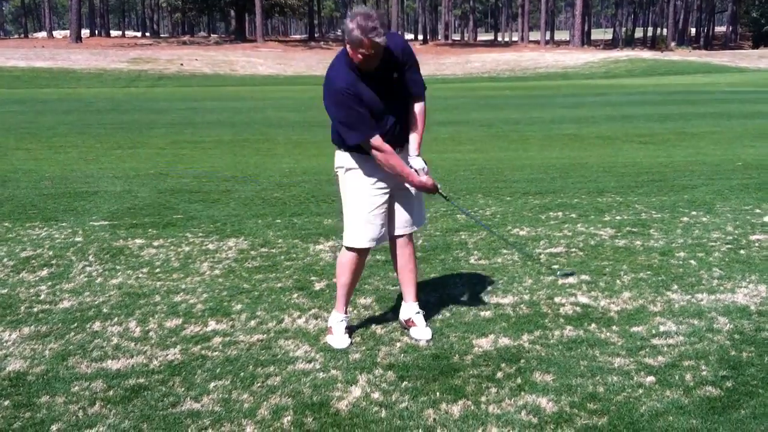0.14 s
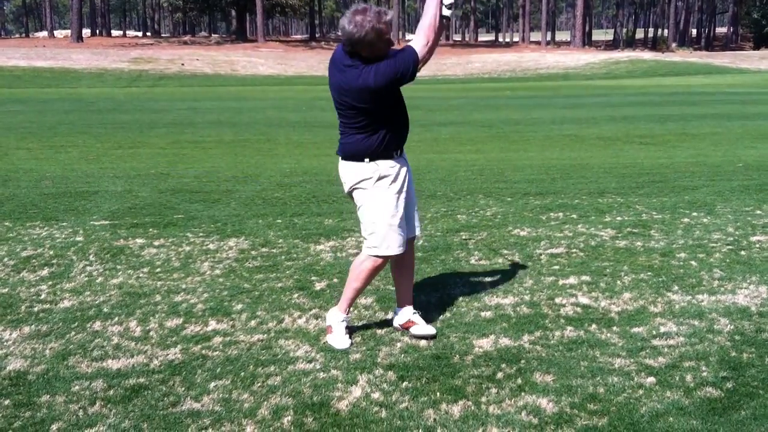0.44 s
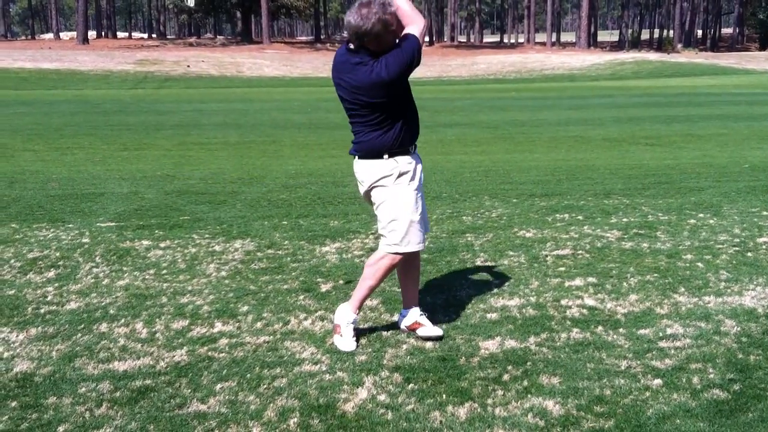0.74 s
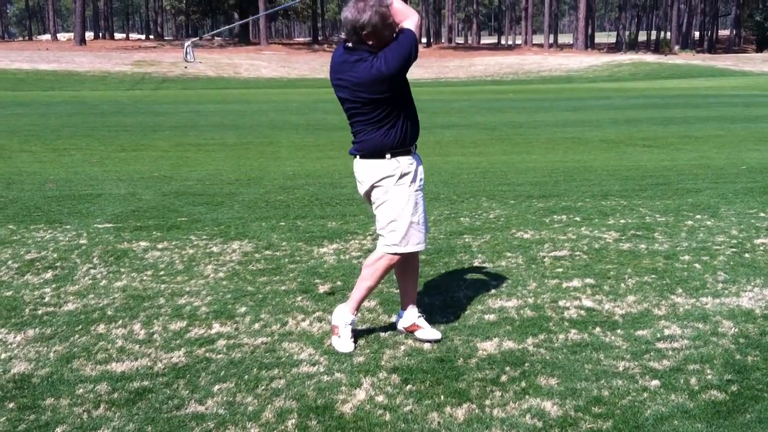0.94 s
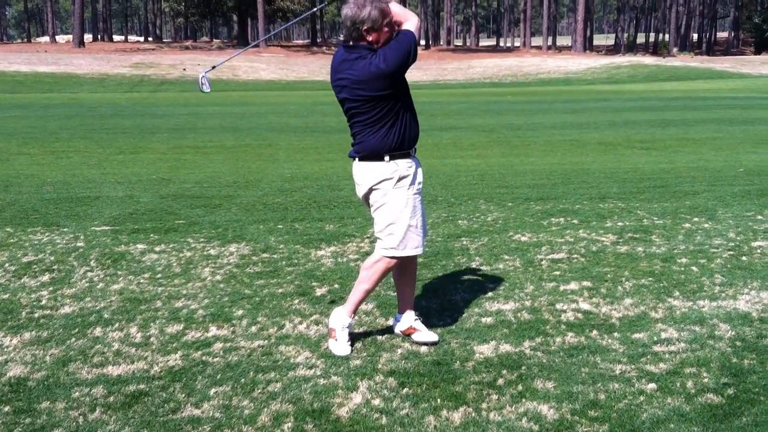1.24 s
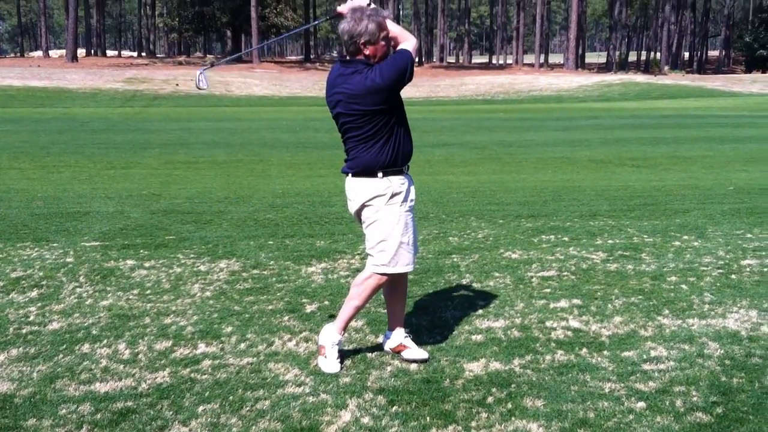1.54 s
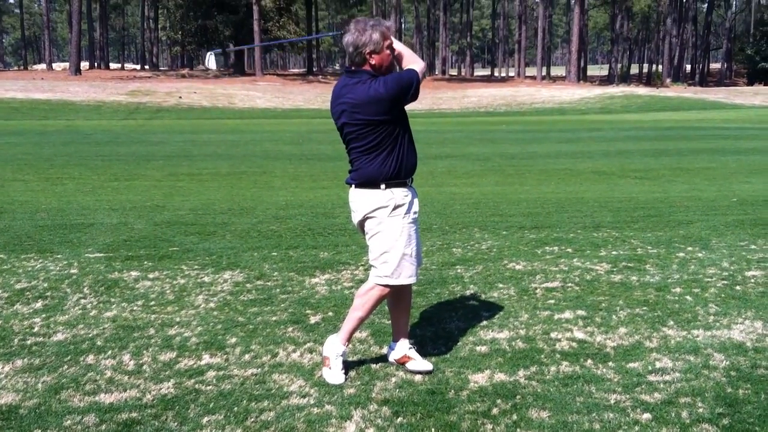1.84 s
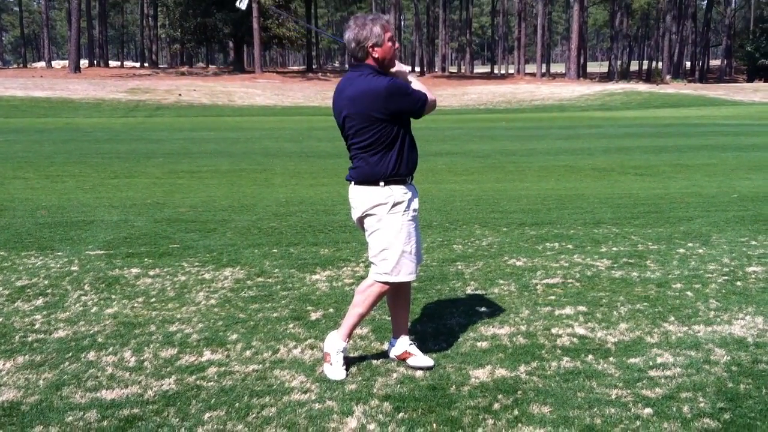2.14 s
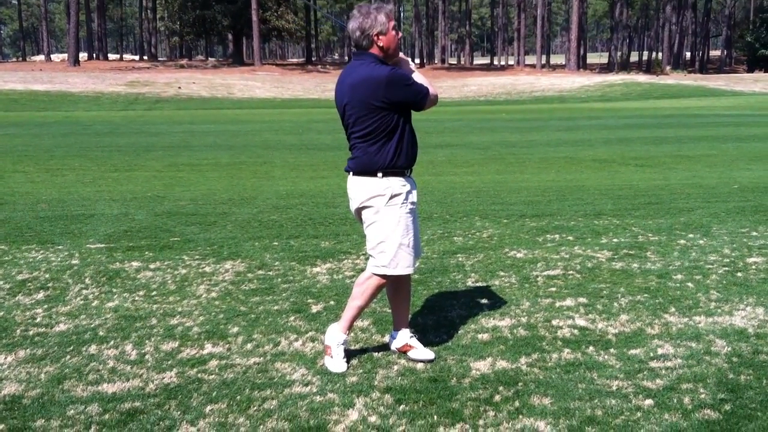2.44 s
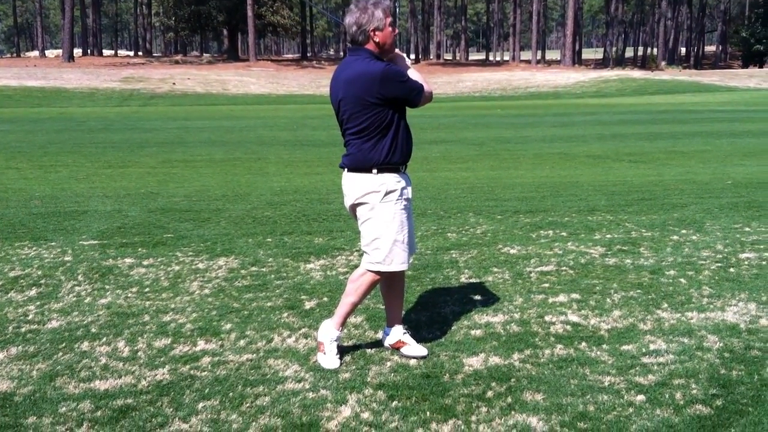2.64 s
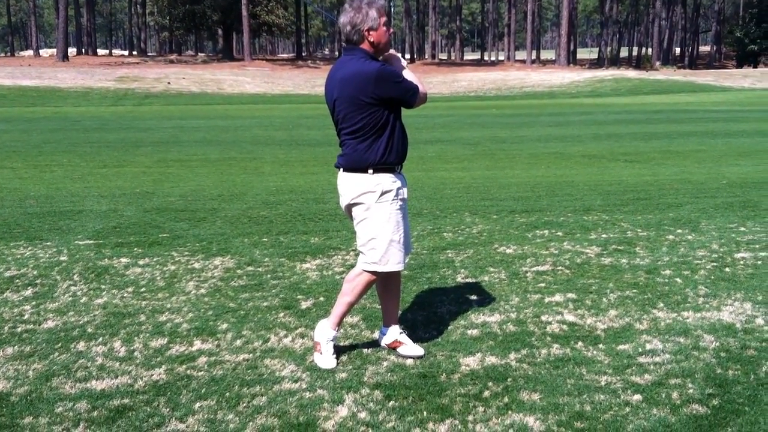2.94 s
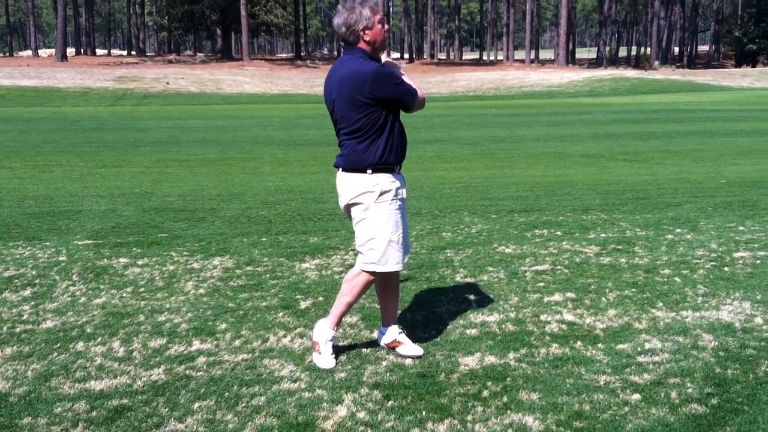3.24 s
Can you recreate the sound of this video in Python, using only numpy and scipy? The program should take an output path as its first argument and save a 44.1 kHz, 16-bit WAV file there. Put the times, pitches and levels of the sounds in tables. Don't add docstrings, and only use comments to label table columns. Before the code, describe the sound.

A golf club cracks sharply against a ball, then wind buffets the microphone in thumps.

```python
import sys
import numpy as np
from scipy import signal
from scipy.io import wavfile
from scipy.ndimage import uniform_filter1d

SR = 44100
rng = np.random.default_rng(int(sys.argv[2]) if len(sys.argv) > 2 else 0)


def ratio_of_db(decibels):
    return 10 ** (np.asarray(decibels, float) / 20)


def bounce(signal):
    frames = np.transpose(np.atleast_2d(signal))
    limited = np.clip(frames, -1, 1)
    pcm = np.round(limited * 32767).astype(np.int16)
    wavfile.write(sys.argv[1], SR, pcm)


N = 149940
T = np.arange(N) / SR

# (frequency [Hz], level [dB], t60 [s])
HEAD_MODES = [(2190, -11, 0.0061), (6460, -9, 0.0039), (1352, -24, 0.0141), (2450, -18, 0.016),
              (3210, -27, 0.025), (462, -38, 0.011), (5110, -22, 0.026), (10570, -9, .008),
              (7410, -23.5, 0.0111), (9500, -10, 0.014), (12100, -23.5, 0.0089)]
# (frequency [Hz], density [dB per Hz])
TURF_COLOUR = [(300, -12), (800, -17), (2300, -1.5), (4000, -13.5), (6500, -4), (8300, -11.5),
               (10600, -5.5), (15000, -37.5)]
# (start [s], attack [s], level [dB], t60 [s])
TURF_BURSTS = [
    (0.176, 0.0017, -33.5, 0.022),
    (0.1822, 0.0011, -20.5, 0.038),
    (0.2, 0.0023, -49, 0.059),
]
# (start [s], attack [s], level [dB], t60 [s])
SPRAY_BURSTS = [
    (.215, 0.02, -60.5, 0.34),
    (.322, 0.0074, -60, 0.082),
    (.456, 0.0076, -64, 0.12),
    (.478, 0.0053, -66.5, 0.19),
    (2.525, .006, -71.5, 0.074),
]
# (frequency [Hz], density [dB per Hz])
SPRAY_COLOUR = [(2000, -61.5), (4000, -6), (5500, 1.5), (9000, -7), (12000, -15.5), (14000, -26.5),
                (15400, -17)]
# (time [s], vortex tone [Hz], tone level [dB], hiss level [dB])
SWISH_PATH = [
    (.04, 290, -72, -80),
    (.086, 350, -54, -67),
    (.128, 440, -49, -53),
    (.17, 490, -46, -55),
    (.183, 470, -47, -58),
    (.197, 420, -64, -61),
    (.255, 330, -72, -63),
    (.29, 300, -85, -80),
]
# (frequency [Hz], density [dB per Hz])
SWISH_COLOUR = [(600, -9.5), (1800, 0.5), (3500, -6.5), (6000, -15.5), (14000, -36.5)]
# (time [s], level [dB], shedding pitch [Hz])
EARLY_EDDIES = [(0.298, -33.5, 257), (0.331, -35, 213), (0.462, -31, 210), (0.579, -25, 237),
                (0.649, -38, 258), (0.673, -33.5, 154), (0.81, -36.5, 236), (0.869, -28, 180),
                (0.883, -27, 235), (0.903, -55, 190), (0.945, -26.5, 203), (1.0, -31.5, 217),
                (1.042, -24, 202), (1.096, -26, 188), (1.161, -26.5, 260), (1.197, -30.5, 166),
                (1.219, -34.5, 187), (1.27, -35, 257), (1.287, -35, 223), (1.353, -20, 159.5),
                (1.377, -28, 275), (1.415, -28, 268), (1.432, -36.5, 197), (1.475, -30, 213),
                (1.552, -32, 203), (1.703, -25.5, 230), (1.73, -47, 266), (1.75, -28, 171),
                (1.837, -34, 188), (1.932, -28.5, 267)]
# (time [s], level [dB], shedding pitch [Hz])
LATE_EDDIES = [(1.945, -26.5, 220), (2.097, -37, 176), (2.12, -34, 188), (2.209, -33.5, 195),
               (2.243, -22.5, 216), (2.276, -37.5, 176), (2.29, -38, 200), (2.31, -29.5, 286),
               (2.358, -23.5, 178), (2.401, -48, 180), (2.42, -34, 172), (2.461, -31.5, 187),
               (2.515, -23.5, 241), (2.585, -28, 231), (2.613, -29, 200), (2.638, -35.5, 180),
               (2.689, -33.5, 244), (2.742, -26.5, 245), (2.841, -31, 278), (2.859, -32, 190),
               (2.883, -21, 262), (2.911, -38, 272), (2.932, -26, 216), (2.959, -33.5, 266),
               (2.982, -39, 200), (2.997, -30.5, 236), (3.01, -35, 202), (3.082, -33, 225),
               (3.116, -26.5, 213), (3.128, -28, 230)]
# (time [s], level [dB], shedding pitch [Hz])
WEAK_EDDIES = [(0.214, -48, 184), (0.404, -46, 187), (0.439, -38.5, 344), (0.451, -37, 214),
               (0.52, -39, 172), (0.591, -33, 224), (0.608, -43.5, 140), (0.661, -41, 218),
               (0.689, -43, 175), (0.711, -38.5, 188), (0.752, -43, 174), (0.77, -43.5, 188),
               (0.794, -42.5, 189), (0.821, -43.7, 174), (0.849, -42, 154), (0.902, -39.5, 211),
               (0.964, -35.5, 215), (1.012, -45.7, 162), (1.077, -28.5, 273), (1.122, -40.5, 188),
               (1.231, -41, 240), (1.248, -46, 160), (1.262, -40, 237), (1.325, -34, 163),
               (1.338, -29.5, 231), (1.398, -34.5, 215), (1.453, -42, 181), (1.501, -46, 200),
               (1.617, -40.5, 214), (1.731, -35, 258), (1.76, -37.5, 176), (1.785, -46, 206),
               (1.795, -41, 178), (1.825, -39.5, 240), (1.912, -40.5, 260), (1.97, -45, 194),
               (2.01, -41.5, 200), (2.028, -46, 162), (2.039, -48.5, 205), (2.144, -45, 164),
               (2.171, -44, 187), (2.227, -37, 218), (2.262, -42, 210), (2.324, -35.5, 171),
               (2.342, -26.5, 178), (2.402, -37, 202), (2.442, -39.5, 222), (2.479, -45.9, 160),
               (2.555, -43, 143), (2.71, -37, 171), (2.804, -45, 170), (2.896, -34, 154), (3.065, -44, 195),
               (3.104, -39, 207), (3.163, -41.5, 200), (3.229, -45.5, 172), (3.336, -44, 196),
               (3.349, -44.5, 184)]
# (time [s], level [dB], width [ms])
EDDY_POPS = [(.294, -31, 0.39), (.44, -41, 0.44), (.571, -37, 0.35), (.581, -42, .4), (.59, -36, 0.67),
             (0.645, -47, 0.42), (.806, -42.5, 0.43), (.94, -41.5, 0.44), (1.029, -45, 0.42),
             (1.042, -42.5, .45), (1.079, -46.5, 0.3), (1.087, -39.5, 0.36), (1.159, -44, 0.49),
             (1.322, -45, .4), (1.335, -38, 0.36), (1.349, -45.5, 0.21), (1.374, -38.5, 0.42),
             (1.406, -38, 0.42), (1.4684, -38, 0.3), (1.4703, -39, .33), (1.7, -37.5, 0.32),
             (1.746, -47.5, 0.22), (1.911, -46, 0.41), (1.93, -38.5, 0.41), (1.938, -36, 0.36),
             (1.95, -38.5, 0.43), (2.233, -40.5, 0.28), (2.349, -43.5, 0.36), (2.36, -38, 0.44),
             (2.517, -40.5, 0.55), (2.58, -34.5, 0.42), (2.88, -46, 0.5), (3.082, -47, 0.48),
             (3.116, -39.5, 0.33)]
# (time [s], pitch [Hz], level [dB])
WHISTLE_GLIDE = [
    (.59, 6830, -92),
    (.63, 6700, -81),
    (.712, 6560, -79),
    (.733, 5700, -78),
    (.762, 5020, -79),
    (.82, 4700, -82),
    (.86, 4620, -76),
    (.875, 4620, -92),
]
# (start [s], length [s], pitch [Hz], level [dB])
BIRD_NOTES = [(.375, .08, 9040, -75), (.445, .04, 9040, -71), (.48, .08, 9040, -77), (.24, .035, 5440, -63),
              (.3, .05, 5440, -73), (.46, .045, 5440, -71), (.5, .045, 5440, -78), (.34, .12, 12700, -90),
              (.31, .24, 15350, -85), (.94, .12, 3490, -77), (1.48, .17, 3490, -76), (.96, .14, 4250, -78)]
# (centre [Hz], bandwidth [Hz], level [dB], loudest at [s], swell
# span [s])
FAR_SINGERS = [
    (1533, 84, -66.5, 2.22, 0.86),
    (2865, 230, -73.5, 2.28, 0.96),
    (2420, 900, -71, 2.14, 0.43),
]
# (frequency [Hz], density [dB per Hz])
AIR_COLOUR = [(60, -33), (150, -9), (300, -25.5), (600, -24), (1500, -27.5), (2800, -38.5), (4000, -43.5),
              (9700, -57), (15500, -66)]


def at_hz(points, hz):
    table = np.array(points)
    return np.interp(np.log(hz), np.log(table[:, 0]), table[:, 1])


def rms_one(x):
    return x / np.sqrt(np.mean(x ** 2) + 1e-20)


def drift(rate_hz):
    r = np.exp(-80 * np.pi * rate_hz / SR)
    slow = signal.lfilter([1], [1, -2 * r, r * r], rng.standard_normal(N // 40 + 2002))[2000:]
    return np.interp(np.arange(N) / 40, np.arange(len(slow)), rms_one(slow))


def coloured(spectrum, patchy_db, shape=lambda hz: 1):
    out, power = 0, 0
    edges = 40 * 2 ** np.arange(0, 9, .5)
    white = rng.standard_normal((2, N))
    for k, (low, high) in enumerate(zip(edges, edges[1:])):
        centre = np.sqrt(low * high)
        sos = signal.butter(2, [low, high], "band", fs=SR, output="sos")
        band = signal.sosfilt(sos, white[k % 2])
        band = band * ratio_of_db(at_hz(spectrum, centre) + patchy_db * drift(9))
        out = out + band * shape(centre)
        power = power + np.mean(band ** 2)
    return out / np.sqrt(power)


def burst(rows):
    out = np.zeros(N)
    for start, attack, db, t60 in rows:
        rise = np.clip((T - start) / attack, 0, 1)
        fall = ratio_of_db(-60 * np.maximum(T - start - attack, 0) / t60)
        out += ratio_of_db(db) * rise * fall
    return out


def bumps(seconds, heights, widths, pitches_hz=None):
    sag = 0.34
    out, k = np.zeros(N + 2000), np.arange(-1000, 1000)
    for j, (s, height, width) in enumerate(zip(seconds, heights, widths)):
        i = int(np.clip(s * SR, 0, N - 1))
        t = (k - (s * SR - i)) / SR
        turns = 0
        if pitches_hz is not None:
            turns = pitches_hz[j] * t * (1 - sag * np.tanh(t / width) / 2)
        bell = np.exp(-.5 * (t / (abs(width) + 1 / SR)) ** 2)
        out[i:i + 2000] += height * bell * np.cos(2 * np.pi * turns)
    return out[1000:N + 1000]


def crack():
    hit_s, contact_s = .18125, 0.00004
    ground_lag_s, ground_db = 0.00022, 4.5
    push = bumps([hit_s, hit_s + ground_lag_s], [-1, ratio_of_db(ground_db)], [contact_s / 4] * 2)
    push = 2 * push / np.abs(push).sum() + 1e-18
    out = 0
    for hz, db, t60 in HEAD_MODES:
        r, w = ratio_of_db(-60 / (t60 * SR)), 2 * np.pi * hz / SR
        out = out + ratio_of_db(db) * signal.lfilter([0, np.sin(w)], [1, -2 * r * np.cos(w), r * r], push)
    thin = signal.butter(1, 911, "high", fs=SR, output="sos")
    return signal.sosfilt(thin, out)


def turf():
    def fall(hz):
        dulling = (3000 / hz) ** .6
        return burst([(s, attack, db, t60 * dulling) for s, attack, db, t60 in TURF_BURSTS])
    return coloured(TURF_COLOUR, 0, fall)


def spray():
    grit = ratio_of_db(2.7 * rng.standard_normal(N // 20 + 1).repeat(20)[:N])
    return burst(SPRAY_BURSTS) * grit * coloured(SPRAY_COLOUR, 3.0)


def swish():
    s, hz, tone_db, hiss_db = np.transpose(SWISH_PATH)
    turns = np.cumsum(np.interp(T, s, hz) * (1 + .11 * drift(90))) / SR
    tone_level = ratio_of_db(np.interp(T, s, tone_db, -140, -140) + 4.8 * drift(50))
    tone = tone_level * np.sqrt(2) * np.sin(2 * np.pi * turns)
    hiss = ratio_of_db(np.interp(T, s, hiss_db, -140, -140)) * coloured(SWISH_COLOUR, 2.2)
    return tone + hiss


def eddies():
    ahead_s = 0.0017
    s, db, hz = np.transpose(EARLY_EDDIES + LATE_EDDIES)
    signs = rng.choice([-1, 1], len(s))
    strong = bumps(s - ahead_s, ratio_of_db(db + 3) * signs, 0.62 / hz, hz)
    s, db, hz = np.transpose(WEAK_EDDIES)
    signs = (-1) ** np.arange(len(s))
    weak = bumps(s - ahead_s, ratio_of_db(db + 4) * signs, 0.53 / hz, hz)
    return strong + weak


def pops():
    s, db, ms = np.transpose(EDDY_POPS)
    return bumps(s, ratio_of_db(db + 17.5), ms / 1000)


def swarm():
    per_s, width_s, span_s = 240, 0.00081, .016
    swarm_db, calm_db = -12.5, -54.5
    s, db, _ = np.transpose(EARLY_EDDIES + LATE_EDDIES)
    gap, push, size = rng.random((1200, 3)).T
    when = np.cumsum(-np.log(1 - gap)) / per_s
    near = np.exp(-((when[:, None] - s - .004) / span_s) ** 2)
    gust = np.sqrt(ratio_of_db(2 * calm_db) + (ratio_of_db(2 * (db + swarm_db)) * near).sum(axis=1))
    heights = 5 * gust * (2 * push - 1) * (when < N / SR)
    return bumps(when, heights, width_s * ratio_of_db(12.1 * (size - .5)))


def birds():
    s, hz, db = np.transpose(WHISTLE_GLIDE)
    glide_hz = uniform_filter1d(np.interp(T, s, hz), size=700)
    level = ratio_of_db(np.interp(T, s, db, -140, -140) + 1.5 * drift(60))
    out = level * np.sqrt(2) * np.sin(2 * np.pi * np.cumsum(glide_hz) / SR)
    for s, length, hz, db in BIRD_NOTES:
        arch = np.sin(np.pi * np.clip((T - s) / length, 0, 1))
        out += ratio_of_db(db + 3.1 * drift(60)) * arch * np.sin(2 * np.pi * hz * T)
    for hz, width, db, s, span in FAR_SINGERS:
        sos = signal.butter(2, [hz - width / 2, hz + width / 2], "band", fs=SR, output="sos")
        song = rms_one(signal.sosfilt(sos, rng.standard_normal(N)))
        swell = np.exp(-.5 * ((T - s) / span) ** 2)
        out += ratio_of_db(db + drift(4.4)) * swell * song
    return out


def air():
    return ratio_of_db(-53.5) * coloured(AIR_COLOUR, 1.3)


def scene():
    club = crack() + turf() + spray() + swish()
    wind = eddies() + pops() + swarm()
    return (club + wind + birds() + air())[None]


def band_limit(x):
    return signal.sosfilt(signal.butter(12, 15940, fs=SR, output="sos"), x)


def record(dry):
    low_cut = signal.butter(4, 114.6, "high", fs=SR, output="sos")
    rumble_cut = signal.butter(2, 30, "high", fs=SR, output="sos")
    top_cut = signal.cheby2(8, 50, 16100, fs=SR, output="sos")
    mix = signal.sosfilt(np.vstack([low_cut, rumble_cut, top_cut]), dry)
    return band_limit(mix)


dry = scene()
out = record(dry)
bounce(out)
```